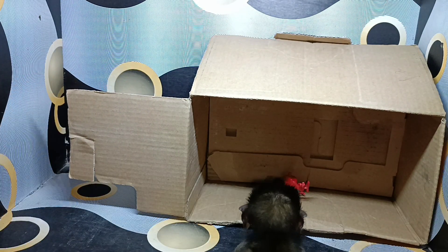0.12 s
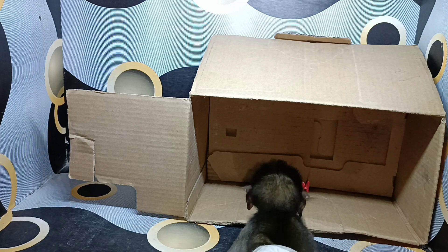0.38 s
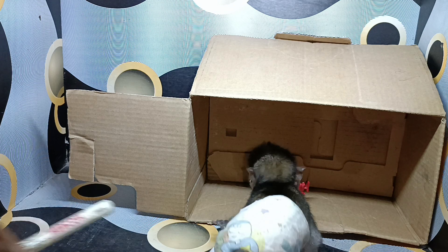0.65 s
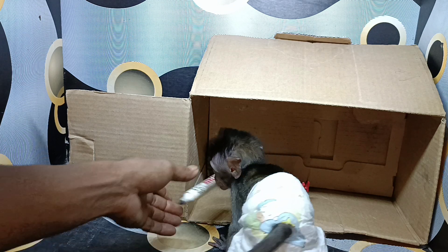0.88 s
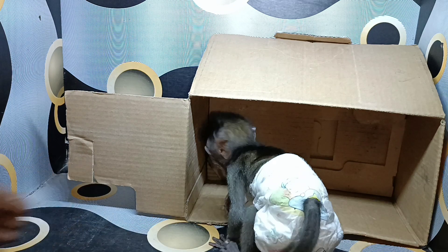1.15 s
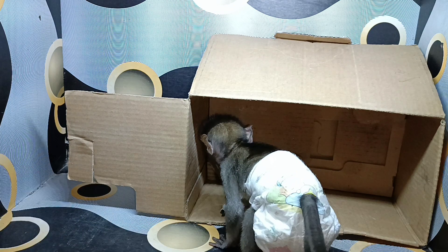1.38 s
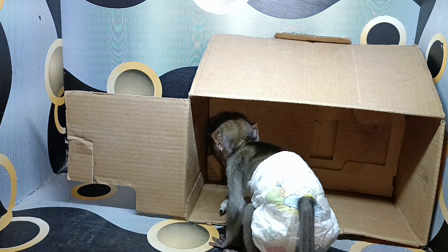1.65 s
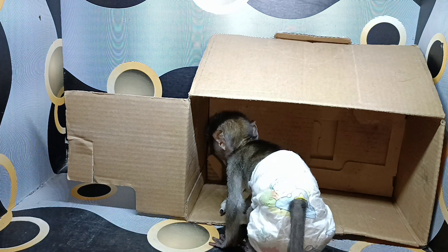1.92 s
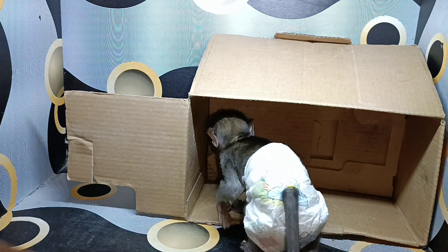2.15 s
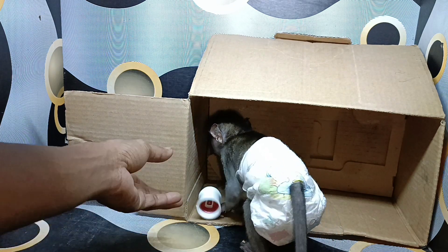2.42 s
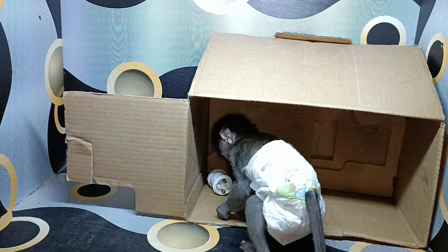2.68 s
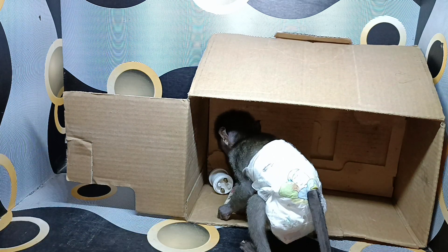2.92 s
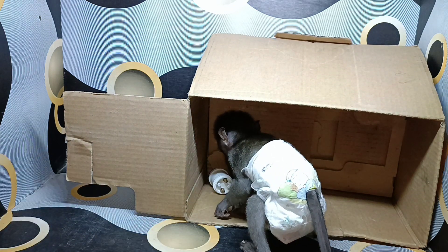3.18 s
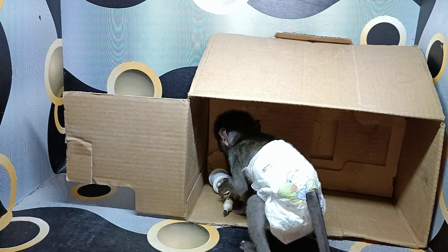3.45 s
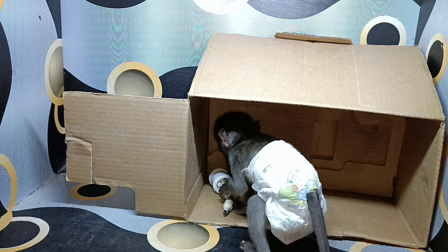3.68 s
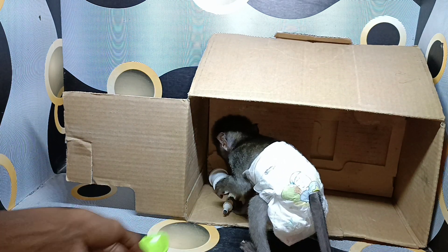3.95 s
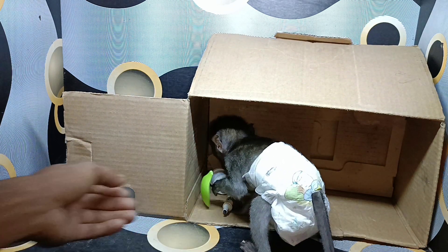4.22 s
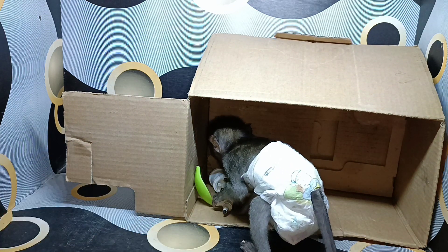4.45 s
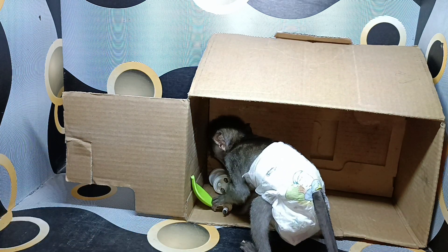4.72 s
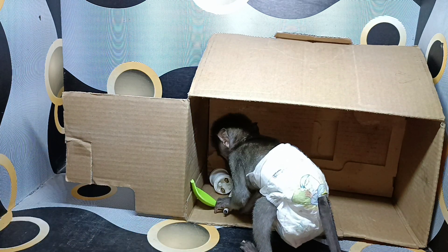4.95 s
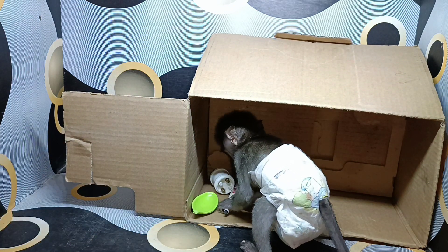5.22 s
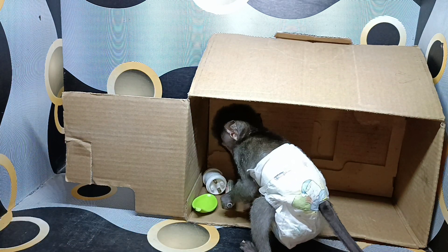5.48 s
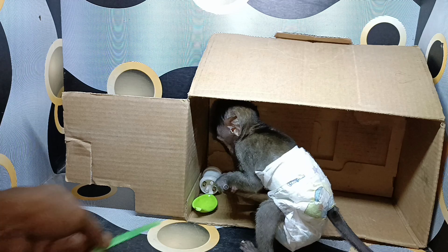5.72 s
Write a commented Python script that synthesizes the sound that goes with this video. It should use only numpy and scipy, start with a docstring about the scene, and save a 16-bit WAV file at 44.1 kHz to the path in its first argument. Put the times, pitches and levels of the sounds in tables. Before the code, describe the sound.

Plastic toys land with loud clacks and hollow booms in a cardboard box, with faint knocks and rustling between them in a quiet, humming room.

```python
"""Faint plastic knocks and rustling over a quiet, humming room; then small toys land with loud clacks and booms.
The toys are tossed into an open cardboard box lying on its side, where a little monkey paws at them.
Chatter rings toy resonances, pushes ring box panels, tiny contacts scuff and rustle, a hard part tinkles.
Captured close by on a phone with two spaced microphones, the left nearer the box, and a fast gain control."""
import sys
import numpy as np
from scipy import signal
from scipy.io import wavfile

SR = 44100
rng = np.random.default_rng(int(sys.argv[2]) if len(sys.argv) > 2 else 0)


def volts(x):
    """Linear amplitude factor 10**(x/20) for a level x in dB, scalar or array-like."""
    e = np.asarray(x, float) / 20
    return 10 ** e


def dump_mix(stems):
    """Bounce the given channels to the path in sys.argv[1] as a 16-bit WAV at rate SR."""
    frames = np.atleast_2d(stems).T  # one column per channel
    limited = np.clip(frames, -1, 1)  # hard clip at full scale
    pcm = np.round(limited * 32767).astype(np.int16)
    wavfile.write(sys.argv[1], SR, pcm)


N = 258426

# half-octave band edges: f/Hz
BAND_EDGES_HZ = 30 * 2 ** np.arange(0, 9.6, .5)
# colour of the room air, before its total is set: (f/Hz, level/dB per Hz)
AIR_COLOUR = [(18, -65), (30, -21.5), (108, 3), (146, -9.5), (162, -16), (250, -9.5), (323, -29),
              (397, -35.5), (439, -26.5), (597, -22.5), (854, -32.5), (2840, -28.5), (5110, -39),
              (10200, -50.5), (13500, -64)]
AIR_DB = -60.5   # total rms of the air
# wavering hum lines: (f/Hz, width/Hz of each of two resonances in a row, rms level/dB)
HUM_LINES = [(113, 4.3, -64.5), (293, 19, -80.5), (590, 36, -77)]
# likeness of left and right at the spaced microphones: (f/Hz, correlation)
STEREO_LIKENESS = [(60, 1), (250, 0.71), (600, -0.83), (1200, -0.76), (3000, 0.18), (9000, -0.066)]
# modes of the cardboard panels and the air inside: (f/Hz, width/Hz, level/dB)
BOX_MODES = [(113, 43, 1), (161, 19, -13), (239, 77, 3), (280, 71, 4.5), (350, 41, 0.5), (420, 37, -2.5),
             (482, 120, -8.5), (629, 17, 0), (762, 6.3, -7)]
# resonances of the stick, the cup and the dish: (f/Hz, width/Hz, level/dB)
STICK_MODES = [(794, 220, -14), (1010, 53, -7), (1330, 150, -7.5), (1580, 170, -8), (2010, 350, -8),
               (2375, 150, -6), (2800, 164, -12), (3460, 300, -17.5), (3680, 28, -11), (4750, 40, -20.5),
               (4700, 170, -18.5), (6400, 72, -15)]
CUP_MODES = [(672, 39, 5.5), (1100, 138, -2), (1785, 370, -11), (2145, 23, -9), (2170, 73, -5),
             (2583, 310, -2.5), (3070, 430, -2), (4600, 53, -33), (5260, 55, -32), (6050, 110, -2.5)]
DISH_MODES = [(670, 40, -6), (802, 30, 1), (955, 60, 0), (1320, 45, 0), (1720, 80, -13), (1930, 70, -11),
              (2170, 90, -14), (2500, 80, -13), (3140, 60, -7), (3830, 60, -12), (4470, 60, -22),
              (5400, 50, -19)]
TOYS = (STICK_MODES, CUP_MODES, DISH_MODES)
CUP_LANDS_S, DISH_LANDS_S = 2.59, 4.29
# a toy tumbles on after landing or a shove:
# (start t/s, hold t/s, wall rumble level/dB, scuffing level/dB, fall/dB per s of the scuffing)
TUMBLES_ON = [(0.128, 0.0065, -43.5, -77, 268), (0.923, 0.019, -85, -101, 314),
              (1.098, 0.0045, -35, -54, 319), (1.157, 0.075, -18, -32, 250),
              (1.531, 0.023, -66, -58.5, 295), (1.633, 0.017, -59, -46.5, 245),
              (2.614, 0.0073, -20, -32.5, 495), (2.656, .006, -16, -26, 480), (2.732, .035, -28, -35, 335),
              (2.871, 0.036, -24.5, -46, 343), (4.295, 0.05, -20, -18, 170), (4.498, 0.054, -38, -55, 303),
              (4.575, 0.048, -40, -65, 292), (4.822, 0.021, -38.5, -62, 300),
              (4.855, 0.13, -50, -69.5, 250), (5.133, 0.023, -63, -54, 349),
              (5.236, 0.051, -57.5, -48, 402), (5.346, 0.015, -35, -53.5, 308),
              (5.673, 0.017, -36.5, -71, 295), (5.759, 0.0047, -28, -59.5, 322)]
TUMBLE_ATTACK_S, RUMBLE_FALLS_FASTER = 0.0054, 1.2   # fall of the rumble as a multiple of the scuffing's
TUMBLE_RUSTLE_DB = -41.5   # relative to the tumble's scuffing
# paws and nappy brush past: (middle t/s, length/s, scuffing level/dB, fine rustle level/dB)
BRUSHES = [(0.023, 0.043, -61, -66.5), (0.138, 0.096, -72, -68), (0.244, 0.086, -65, -65.5),
           (0.415, 0.055, -57.5, -63), (0.69, 0.061, -63.5, -59.5), (0.812, 0.046, -75, -69),
           (1.033, 0.035, -78, -86), (1.216, 0.1, -50, -47), (1.373, 0.14, -58, -67),
           (1.727, 0.048, -71, -93), (1.982, 0.096, -50, -67.5), (2.245, 0.063, -61.5, -75),
           (2.482, 0.11, -70, -75.5), (2.616, 0.02, -30, -40.5), (2.984, 0.068, -60, -82),
           (3.323, 0.069, -54, -63), (3.432, 0.096, -69, -71), (3.527, 0.15, -93, -65),
           (3.687, .1, -64.5, -79.5), (3.998, 0.12, -82, -80), (4.715, 0.07, -65.5, -83.5),
           (4.815, 0.029, -49, -76), (4.984, 0.015, -74, -78), (5.291, 0.084, -45.5, -52.5),
           (5.393, 0.07, -63, -68.5), (5.511, 0.24, -62, -75.5), (5.752, 0.066, -60.5, -76.5)]
# weight shifting all the time: level/dB of rumble, scuffing, rustle
RESTING_LEVELS = (-66.5, -84, -95.5)
# rumble band of stick, cup and dish; the long stick shakes the whole wall: (low f/Hz, high f/Hz)
RUMBLE_BANDS = [(80, 800), (120, 900), (100, 600)]
SLAP = 0.36   # dull slap of the cardboard relative to its ringing modes
# plain scratch mixed with the ring of stick, cup and dish: (factor)
PLAIN_SCRATCH = (.04, .05, .02)
# colour of hard rattling on cardboard: (f/Hz, level/dB per Hz)
CLATTER_COLOUR = [(700, 5.5), (1200, 14), (2200, 15.5), (3500, 2.5), (5200, -15.5), (7500, -42.5)]
HARD_DB = -35   # scuffing this loud is half clatter, half ring in power
# colour of the fine rustle: (f/Hz, level/dB per Hz)
RUSTLE_COLOUR = [(2350, -31), (4000, -1), (4160, -4.5), (5250, 2.5), (8890, -12), (10600, -10.5),
                 (13000, -21)]
# plastic knocks: (t/s, peak level/dB of the part at 600-4000 Hz, struck face f/Hz,
# crack level/dB re that peak before a common 13.5 dB lift, chatter t60/s before limits of 0.003 and 0.3)
PLASTIC_KNOCKS = [(0.015, -68, 2010, -22, .02), (0.032, -44.5, 2010, -20, 0.019),
                  (0.132, -45.5, 1330, -4.5, 0.092), (0.434, -49.5, 2010, -33, 0.012),
                  (1.097, -43.5, 1360, -33, 0.29), (1.159, -7.5, 2800, -26.5, 0.031),
                  (1.204, -17.5, 1330, -37, 0.03), (1.228, -16.5, 2200, -30, 0.022),
                  (1.25, -27.5, 1180, -22, 0.12), (1.639, -49, 2000, -17, 0.055),
                  (1.669, -44, 1000, -33, 0.2), (1.744, -43, 2200, -35, 0.11),
                  (1.801, -30, 1010, -36, 0.058), (1.924, -42, 1000, -30, 0.26),
                  (1.952, -41, 2820, -27, 0.027), (1.965, -32, 1050, -23, 0.088),
                  (2.601, -34, 2660, -18, 0.18), (2.61, -20.5, 1110, -25, 0.11),
                  (2.656, -13.5, 1790, -26, 0.071), (2.7313, -7, 1680, -29, .035),
                  (2.761, -15, 1400, -48, .02), (2.851, -13.5, 1100, -43, .035),
                  (2.884, -17.5, 1785, -40, 0.027), (2.905, -23.5, 820, -33, 0.034),
                  (2.98, -51.5, 2900, -44, 0.054), (3.285, -41, 2220, -12, 0.048),
                  (3.3065, -36, 2200, -12, .02), (3.341, -49, 2280, -12, .03),
                  (3.729, -59, 3130, -10, .015), (4.2967, 2.5, 3200, -34, .025),
                  (4.5, -44.5, 780, -24.5, 0.037), (4.586, -38.5, 775, -40, 0.087),
                  (4.687, -46, 2650, -38, 0.13), (4.809, -31, 870, -18.5, 0.049),
                  (4.889, -39, 2170, -29, 0.053), (4.896, -41, 1320, -31, 0.071),
                  (4.94, -47.5, 1000, -36.5, 0.33), (5.031, -56, 1320, -40.5, .03),
                  (5.057, -50.5, 1320, -31, 0.034), (5.078, -51.5, 3140, -14.5, 0.017),
                  (5.137, -38.5, 955, -25, 0.18), (5.159, -38, 807, -28, 0.12),
                  (5.185, -43, 1010, -35, 0.042), (5.24, -33.5, 955, -14.5, 0.062),
                  (5.252, -36, 955, -32, 0.027), (5.277, -31, 1090, -21, 0.035),
                  (5.35, -38, 835, -16.5, 0.059), (5.502, -65, 3080, 3.5, 0.069),
                  (5.586, -70, 1330, 8, 0.032), (5.683, -38.5, 1120, -39, 0.047),
                  (5.733, -49.5, 760, -21, 0.1), (5.76, -33.5, 760, -26.5, 0.11)]
FIRST_CONTACT, FIRST_CONTACT_S = 0.86, 0.0013   # sharp start of each chatter: height, time constant
# where the toys lie between the microphones: (t/s, left-over-right level/dB)
TOY_POSITION = [(0, -2), (1.3, 0), (1.8, 6), (2.6, 1), (2.9, -1), (3.3, 4), (4.3, 1), (4.8, 0), (5.1, 7),
                (5.3, 2.5), (5.8, 0)]
LAG_S_PER_DB, TOY_LEAD_S = 3e-5, .00012   # the left microphone is nearer the open box
# decay of the room: (f/Hz, t60/s)
ROOM_DECAY = [(100, 0.2), (400, 0.18), (1500, 0.17), (4000, 0.057), (9000, 0.1)]
ROOM_DB = -9.5
# blows on the box walls: (t/s, peak level/dB, struck panel f/Hz, t60/s before limits of 0.008 and 0.16)
WALL_BLOWS = [(0.129, -35.5, 261, 0.067), (0.149, -21.5, 171, 0.084), (0.896, -19.5, 142, 0.032),
              (1.098, -31, 230, 0.092), (1.1633, -7, 510, 0.0057), (1.18, -7.5, 113, 0.057),
              (1.227, -9.5, 420, 0.0068), (1.946, -47.5, 425, 0.24), (2.609, -26.5, 330.6, 0.23),
              (2.656, -15.5, 281, 0.13), (2.677, -9, 165, 0.021), (2.731, -7.5, 290, 0.084),
              (2.76, -11, 303.5, 0.0098), (2.849, -7, 321, 0.02), (2.884, -20, 283.2, 0.19),
              (2.904, -29, 322, 0.069), (4.296, -11, 348.6, 0.19), (4.5, -27.5, 270, 0.018),
              (4.586, -24, 235, 0.086), (4.718, -40.5, 275, 0.17), (4.809, -26.5, 395, 0.19),
              (4.893, -33, 376, 0.11), (5.162, -39.5, 416, 0.27), (5.274, -31.5, 420, 0.23),
              (5.351, -27.5, 420, 0.091), (5.682, -26, 293, 0.063), (5.755, -27.5, 341, 0.2),
              (5.769, -27.5, 421, 0.091)]
LONGEST_RING_S = .16   # of a cardboard panel
# faint tones that swell and fade, and a few brief high ticks: (middle t/s, f/Hz, level/dB of the steady core,
# length/s)
SWELLING_TONES = [(0.407, 97.1, -43.5, 0.08), (1.012, 1940, -63, 0.021), (1.68, 350, -49.5, 0.12),
                  (2.125, 3770, -78, 0.27), (3.22, 717, -63, 0.073), (3.296, 242, -41, 0.083),
                  (3.462, 265, -59, 0.084), (3.64, 1043, -67.5, 0.08), (4.183, 611.6, -51, 0.13),
                  (4.235, 1542, -61, 0.13), (3.932, 5670, -63, 0.0066), (3.93, 10200, -63.5, .008),
                  (4.633, 6400, -62, 0.0087), (4.982, 8570, -67, 0.011), (5.353, 4620, -52.5, 0.0075),
                  (5.622, 632, -54, 0.069)]
# tinkles of the hard part: (t/s, peak level/dB)
TINKLE_HITS = [(3.494, -40.5), (3.5385, -37.5), (4.299, -19.5)]
# modes of the hard part: (f/Hz, level/dB, t60/s)
TINKLE_MODES = [(2400, -1, .1), (2530, -4, .1), (2860, -8, .05), (3690, -8, .06), (5200, -6, .04),
                (5340, -2, .07), (6395, -10, .04), (8420, -10, .025), (10800, -13, .03)]


def rms_one(x):
    """Scale the whole signal to rms 1."""
    return x / np.sqrt(np.mean(x ** 2) + 1e-20)


def peak_one(x):
    """Scale each row to peak 1."""
    return x / (np.abs(x).max(axis=-1, keepdims=True) + 1e-20)


def at_hz(points, hz):
    """Read a table along a logarithmic frequency axis."""
    table = np.array(points)
    return np.interp(np.log(hz), np.log(table[:, 0]), table[:, 1])


def cut(x, hz, kind, order=2):
    """Butterworth filter."""
    return signal.sosfilt(signal.butter(order, hz, kind, fs=SR, output="sos"), x)


def resonate(x, hz, width_hz):
    """Two-pole resonance with gain 1 on top."""
    r = np.exp(-np.pi * np.asarray(max(width_hz, 1.)) / SR)
    poles = [1, -2 * r * np.cos(2 * np.pi * hz / SR), r * r]
    return signal.lfilter([(1 - r * r) / 2, 0, (r * r - 1) / 2], poles, x + 1e-18)


def ring_width_hz(t60):
    """Width of a resonance that decays by 60 dB in t60 seconds."""
    return np.log(1000) / (np.pi * t60)


def drift(rate_hz):
    """Slow chance with rms 1, drawn at every 40th sample."""
    r = np.exp(-80 * np.pi * rate_hz / SR)
    white = rng.standard_normal(N // 40 + 2002)
    slow = signal.lfilter([1], [1, -2 * r, r * r], white)[2000:]   # without the filter's run-in
    return np.interp(np.arange(N) / 40, np.arange(len(slow)), rms_one(slow))


def stereo_bands(count):
    """Half-octave noise bands, as alike left and right as the spacing of the microphones allows."""
    white = rng.standard_normal((2, 2, count))   # neighbouring bands use different noise
    for k, (low, high) in enumerate(zip(BAND_EDGES_HZ, BAND_EDGES_HZ[1:])):
        hz = np.sqrt(low * high)
        mid, side = cut(white[k % 2], [low, high], "band")
        alike = np.clip(at_hz(STEREO_LIKENESS, hz), -1, 1)
        yield hz, np.sqrt(1 + alike) * mid + np.sqrt(1 - alike) * side * [[1], [-1]]


def coloured(x, colour, edges_hz):
    """Weight half-octave bands of a signal by a colour table."""
    return sum(volts(at_hz(colour, np.sqrt(low * high))) * cut(x, [low, high], "band")
               for low, high in zip(edges_hz, edges_hz[1:]))


def background():
    """Patchy room air, its bands drifting together and apart, with a few wavering hum lines."""
    together = drift(0.73)
    air = sum(volts(at_hz(AIR_COLOUR, hz) + 1.7 * together + 2.5 * drift(28)) * band
              for hz, band in stereo_bands(count=N))
    hum = 0
    for hz, width_hz, db in HUM_LINES:
        line = resonate(rng.standard_normal(N), hz, width_hz)
        hum = hum + volts(db) * rms_one(resonate(line, hz, width_hz))
    return volts(AIR_DB) * rms_one(air) + hum


def toy_in_play(s):
    """0 stick, 1 cup, 2 dish: the newest toy gets the attention."""
    return np.searchsorted([CUP_LANDS_S, DISH_LANDS_S], s)


def box(force, strength):
    """The cardboard panels and the air inside ring in broad modes."""
    return sum((-1) ** k * volts(db) * strength[k] * resonate(force, hz, width_hz)
               for k, (hz, width_hz, db) in enumerate(BOX_MODES))


def grains(per_s, spread_db):
    """Clumped micro-contacts of uneven size; a third stream reaches both sides, weaker and inverted right."""
    born = rng.random((3, N)) < per_s * volts(5.0 * drift(25)) / SR
    size = volts(spread_db * np.minimum(rng.exponential(1, (3, N)), 5))
    g = born * size * rng.choice([-1, 1], (3, N))
    return g[:2] + 0.24 * g[2] * [[1], [-.4]]


def effort():
    """Gains of rumble, scuffing and rustle: tumbles start at once, hold and fall; strokes swell and fade."""
    t = np.arange(0, N + 32, 32) / SR
    s, hold, rumble_db, scuff_db, fall = np.transpose(TUMBLES_ON)[:, :, None]
    rise = np.clip((t - s) / TUMBLE_ATTACK_S, 0, 1)
    late = np.maximum(t - s - hold, 0)
    rumble = np.sum(rise * volts(rumble_db - RUMBLE_FALLS_FASTER * fall * late), axis=0)
    tumble = np.sum(rise * volts(scuff_db - fall * late), axis=0)
    s, length, scuff_db, rustle_db = np.transpose(BRUSHES)[:, :, None]
    swell = np.exp(-4 * ((t - s) / length) ** 2)
    scuff = tumble + np.sum(volts(scuff_db) * swell, axis=0)
    rustle = volts(TUMBLE_RUSTLE_DB) * tumble + np.sum(volts(rustle_db) * swell, axis=0)
    return [np.interp(np.arange(N) / SR, t, gain + volts(db))
            for gain, db in zip((rumble, scuff, rustle), RESTING_LEVELS)]


def wall_rumble(now):
    """Bumps ring the box modes and slap the cardboard dully, in the band of the toy in play."""
    pressed = [volts(3 * drift(4)) for mode in BOX_MODES]
    bumps = grains(600, 2.5)
    shared = bumps.sum(axis=0)
    ringing = box(shared + 1.2 * bumps, pressed)
    slap = cut(shared + bumps, [380, 1000], "band")
    walls = rms_one(ringing) + SLAP * rms_one(slap)
    return sum((now == k) * rms_one(cut(walls, band, "band")) for k, band in enumerate(RUMBLE_BANDS))


def toy_scuff(now):
    """Rubbing rings the toy in play; as it turns, other modes come forward from moment to moment."""
    rub = grains(1200, 4.2)
    facing_db = [3.5 * drift(5) for mode in DISH_MODES]
    scuff = np.zeros((2, N))
    for number, (toy, scratch) in enumerate(zip(TOYS, PLAIN_SCRATCH)):
        held = now == number
        rings = scratch * rub[:, held]
        for k, (hz, width_hz, db) in enumerate(toy):
            gain = (-1) ** k * volts(db + facing_db[k][held])
            rings = rings + gain * resonate(rub[:, held], hz, width_hz)
        scuff[:, held] = rms_one(cut(cut(rings, 720, "high", order=4), 4800, "low", order=3))
    return scuff


def handling():
    """Paws and toys drag over cardboard: wall rumble, plastic scuffing, hard clatter, fine rustle on top."""
    rumbling, scuffing, rustling = effort()
    now = toy_in_play(np.arange(N) / SR)
    rumble = wall_rumble(now)
    scuff = toy_scuff(now)
    clatter = coloured(grains(3000, 3.2), CLATTER_COLOUR, BAND_EDGES_HZ[9:17])
    clatter = rms_one(cut(clatter, 8300, "low", order=4))
    hard = scuffing / (scuffing + volts(HARD_DB))   # louder scuffing holds more clatter
    scuff = np.sqrt(1 - hard) * scuff + np.sqrt(hard) * clatter
    rustle = coloured(grains(4800, 0.86), RUSTLE_COLOUR, BAND_EDGES_HZ[14:-1])
    return rumbling * rms_one(rumble) + scuffing * scuff + rustling * rms_one(rustle)


def place(times, sounds, pan_db, lead_s=0):
    """Level and delay between the microphones; positive pan is louder and earlier on the left."""
    out = np.zeros((2, N + SR))
    for s, sound, pan in zip(times, sounds, pan_db):
        for side, sign in enumerate((1, -1)):
            arrival_s = s - sign * (pan * LAG_S_PER_DB + lead_s) / 2
            at = max(round(arrival_s * SR), 0)
            out[side, at:at + len(sound)] += volts(sign * pan / 2) * sound
    return out[:, :N]


def knocks():
    """A brief chatter of contact drives the toy's resonances, most of all near the pitch of the struck face."""
    s, peak_db, face_hz, crack_db, t60 = np.transpose(PLASTIC_KNOCKS)[:, :, None]
    t = np.arange(SR // 5) / SR
    chatter = rng.standard_normal((len(s), len(t)))
    chatter = chatter * volts(-60 * t / np.clip(t60, .003, .3)) * (1 - np.exp(-t / 0.00054))
    chatter = chatter * volts(3 * np.minimum(rng.exponential(1, chatter.shape), 5))   # uneven contacts
    chatter = chatter * (1 + FIRST_CONTACT * np.exp(-t / FIRST_CONTACT_S))
    chance_db = 2 * rng.standard_normal((len(s), len(DISH_MODES)))
    body = (0.022 + 0.044 / (1 + volts(-16.5 - peak_db))) * chatter   # hard blows add plain clack
    for number, toy in enumerate(TOYS):
        hit = toy_in_play(s[:, 0]) == number
        for k, (hz, width_hz, db) in enumerate(toy):
            near_db = -11 * np.abs(np.log2(hz / face_hz[hit]))   # 11 dB weaker per octave away
            gain = (-1) ** k * volts(db + near_db + chance_db[hit, k:k + 1])
            body[hit] += gain * resonate(chatter[hit], hz, width_hz)
    low = peak_one(cut(body, [600, 4000], "band", order=3))
    crack = peak_one(cut(body, [4000, 7000], "band"))
    crack = crack + volts(-5.5) * peak_one(cut(chatter, [6000, 10500], "band"))
    crack = crack + volts(-12) * peak_one(cut(chatter, 11000, "high"))
    sounds = volts(peak_db) * (low + volts(crack_db + 13.5) * crack)
    pan_db = np.interp(s[:, 0], *np.transpose(TOY_POSITION))
    return place(s[:, 0], sounds, pan_db, TOY_LEAD_S)


def room(x):
    """Diffuse echoes build up over some tens of milliseconds and die away band by band."""
    t = np.arange(SR // 2) / SR
    tail = sum(band * volts(-60 * t / at_hz(ROOM_DECAY, hz)) for hz, band in stereo_bands(count=len(t)))
    tail = tail * (1 - np.exp(-t / 0.02))
    tail = tail / np.sqrt(np.sum(tail ** 2) / 2)
    return signal.fftconvolve(x.mean(axis=0)[None], tail, axes=1)[:, :N]


def thuds():
    """A soft, shuddering push rings the struck panel strongly and the rest of the box more weakly."""
    s, peak_db, panel_hz, t60 = np.transpose(WALL_BLOWS)
    t = np.arange(SR // 2) / SR
    shudder = cut(rng.standard_normal((len(s), len(t))), 660, "low", order=4)
    shudder = shudder * volts(-60 * t / 0.031) * (1 - np.exp(-t / 0.0022))
    push = np.sin(np.pi * np.clip(t / .003, 0, 1)) ** 2 + .6 * shudder
    # a panel stirs mostly the modes near its own pitch
    octaves_away = np.abs(np.log2(np.array(BOX_MODES)[:, 0] / panel_hz[:, None]))
    strength = volts(4.0 * rng.standard_normal((len(s), len(BOX_MODES))) - 6 * octaves_away)
    rest = peak_one(box(push, strength.T[:, :, None]))
    panel = [resonate(p, hz, ring_width_hz(np.clip(ring_s, .008, LONGEST_RING_S)))
             for p, hz, ring_s in zip(push, panel_hz, t60)]
    sounds = peak_one(peak_one(np.array(panel)) + volts(-12.5) * rest)
    return place(s + 0.0015, volts(peak_db)[:, None] * sounds, 0.2 + 0 * s)


def tones():
    """A steady core with a narrow band of noise around it, heard as a wavering tone, under a smooth swell."""
    t, white = np.arange(N) / SR, rng.standard_normal(N)
    out = np.zeros(N)
    for s, hz, db, length in SWELLING_TONES:
        swell = np.exp(-4 * ((t - s) / length) ** 2)
        core = np.sin(2 * np.pi * hz * t)
        waver = rms_one(resonate(white, hz, 12 + .012 * hz))
        out += volts(db) * swell * (core + .35 * waver)
    return out


def tinkles():
    """A small hard part, ticked by a burst of noise, rings at its own high modes."""
    s, peak_db = np.transpose(TINKLE_HITS)
    t = np.arange(SR // 3) / SR
    tick = rng.standard_normal((len(s), len(t))) * volts(-60 * t / 0.06)
    rings = sum(volts(db) * peak_one(resonate(tick, hz, ring_width_hz(t60))) for hz, db, t60 in TINKLE_MODES)
    return place(s, volts(peak_db)[:, None] * peak_one(rings), 1.0 + 0 * s)


def scene():
    """Blows fill the room; handling, tones and air lie around them."""
    blows = knocks() + thuds() + tinkles()
    return blows + volts(ROOM_DB) * room(blows) + handling() + tones() + background()


def top_cut(x):
    """Nothing passes above the cut-off."""
    return signal.sosfilt(signal.butter(12, 16790, fs=SR, output="sos"), x)


def record(dry, knee_db=-20, ratio=0.34, release_db_per_s=150):
    """The gain control ducks just after loud peaks and recovers fast; the microphone port rings near the top."""
    fall = release_db_per_s * np.arange(N) / SR
    level = 20 * np.log10(np.abs(dry).max(axis=0) + 1e-9)
    held = np.maximum.accumulate(level + fall) - fall   # peak level, falling at the release rate
    r = np.exp(-1 / (0.0012 * SR))   # the ducking lags by 1.2 ms
    duck_db = signal.lfilter([1 - r], [1, -r], -ratio * np.maximum(held - knee_db, 0))
    x = dry * volts(duck_db)
    x = cut(x, 88, "high", order=4) + volts(-19) * cut(x, 60, "low")   # a little deep bass stays
    x = x + volts(16.5) * resonate(x, 15200, 630)   # microphone port
    x = signal.sosfilt(signal.cheby2(10, 30, 16300, fs=SR, output="sos"), x)   # steep low-pass
    return top_cut(x)


dry = scene()
out = record(dry)
dump_mix(out)
```